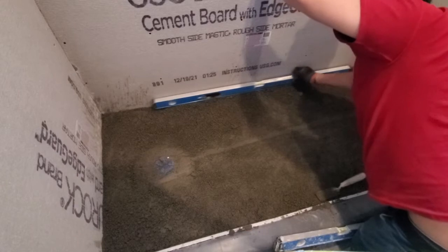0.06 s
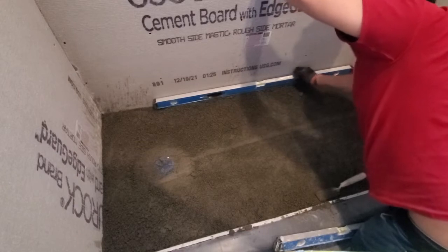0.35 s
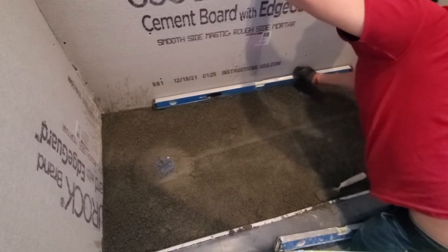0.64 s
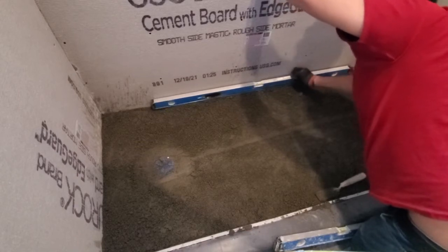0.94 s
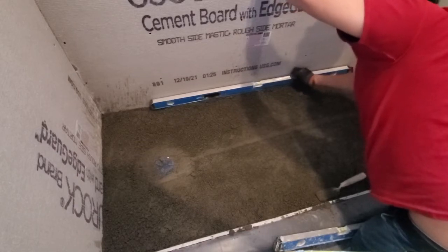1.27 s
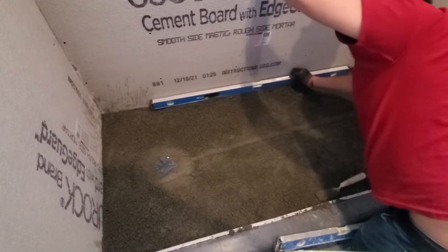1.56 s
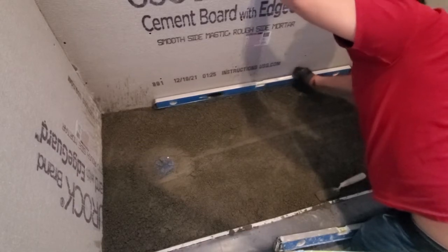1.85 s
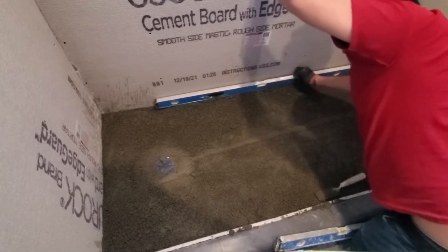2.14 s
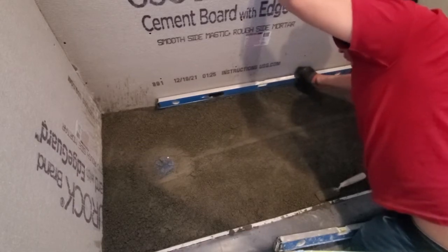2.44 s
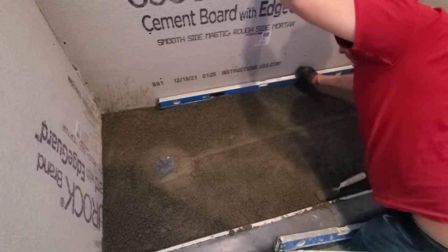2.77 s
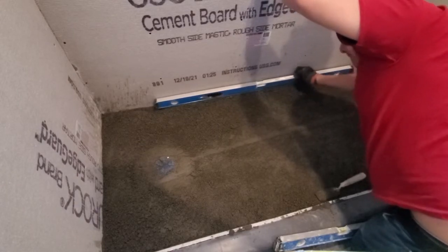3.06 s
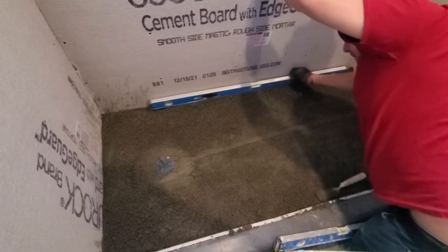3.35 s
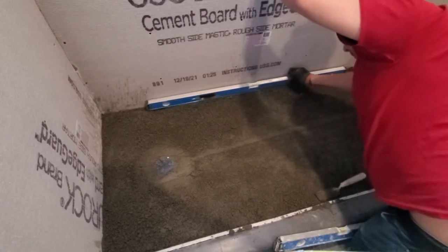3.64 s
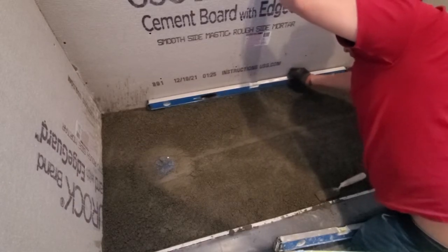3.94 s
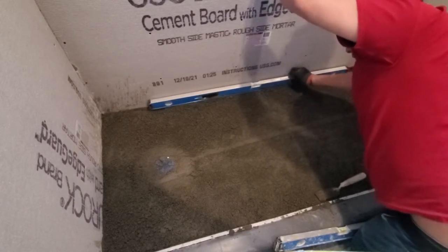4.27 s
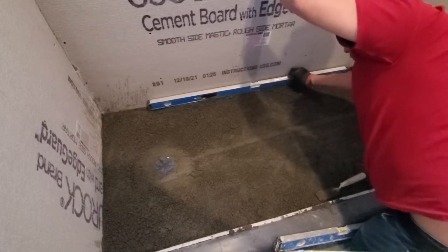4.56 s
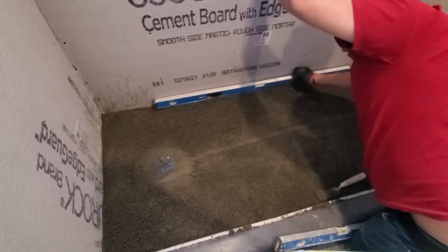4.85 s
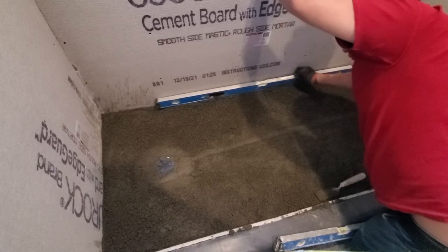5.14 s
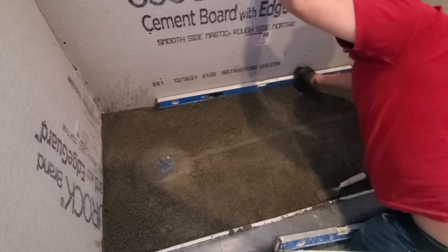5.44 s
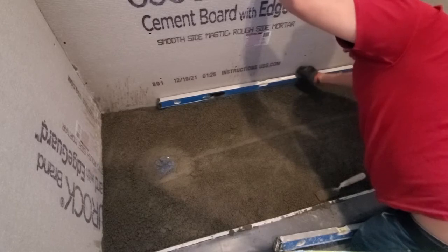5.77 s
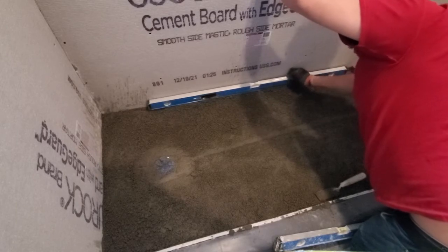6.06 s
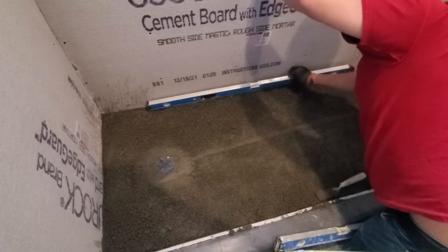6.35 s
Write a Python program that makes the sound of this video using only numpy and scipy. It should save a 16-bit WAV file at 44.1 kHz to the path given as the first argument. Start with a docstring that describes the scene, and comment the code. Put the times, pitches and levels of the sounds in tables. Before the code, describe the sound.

Fast, rhythmic, gritty scraping fills a small, hard-walled shower stall as a metal level is worked to and fro across a sandy mortar bed. Scattered knocks from the bar and soft thuds from the floor come through the strokes. After about six seconds the level lifts, is set down gently and skims twice more with a faint brushing hiss. The sound is close, with tight echoes.

```python
"""A long aluminium level is sawn to and fro over a damp sand-cement bed, three times a second.
Each stroke drags sand under its edge: coarse grit judders the bar, finer grit rasps, loose grains hiss.
The bar knocks on high spots; the floor thuds and rumbles under the shifting weight.
Near the end the level is lifted, set down and drawn twice lightly, with a faint brushing.
The board-lined shower stall adds short, dense echoes."""
import sys
import numpy as np
from scipy import signal
from scipy.fft import rfft, irfft, next_fast_len
from scipy.io import wavfile
from scipy.ndimage import uniform_filter1d

SR = 44100
rng = np.random.default_rng(int(sys.argv[2]) if len(sys.argv) > 2 else 0)


def put_to_file(sound):
    """Save the sound as 16-bit audio at rate SR, in the file named by the first command-line argument."""
    columns = np.atleast_2d(sound).T  # one column per channel
    safe = np.clip(columns, -1, 1)
    whole_steps = np.round(safe * 32767)
    wavfile.write(sys.argv[1], SR, whole_steps.astype(np.int16))


N = 286946
T = np.arange(N) / SR
PLACES = 6  # contact points along the edge
LIFT_S = 5.997  # the last push ends, the bar leaves the bed

# Broad spectra. Each row: frequency in Hz, relative density in dB.
ROOM_TONE_HZ_DB = [(20, -3), (70, -4), (150, -16), (400, -27), (2300, -30), (3200, -30), (4500, -26),
                   (5900, -15), (7500, -27), (9000, -23), (12000, -33.5), (15000, -47)]
RUMBLE_HZ_DB = [(15, -2), (35, -10), (55, -5), (68, 9), (85, 0.5), (110, 5.5), (145, 1.5), (220, -35),
                (600, -52)]
BRUSH_HZ_DB = [(200, -7), (2400, -1), (2900, 6), (4500, 0), (6200, -1), (7500, -8), (9500, 0), (12000, -5),
               (15500, -5)]
HOLLOW_BAR_HZ_DB = [(40, -5), (140, -8), (300, -12.5), (410, -16), (650, 0), (1150, -0.5), (1700, 0),
                    (2300, -6), (3100, 0), (3600, -18), (8000, -34)]
GRIND_HZ_DB = [(20, -10), (45, -19), (70, -3), (115, -2), (200, -5), (320, -8), (480, -8.5), (750, -5),
               (1100, -13.5), (2000, -21), (5000, -62.5)]
RASP_HZ_DB = [(200, -44.5), (600, -5), (1100, -5.5), (1750, 1.5), (2450, -1), (3100, 0.5), (3800, 0),
              (5000, -4), (5900, -7.5), (7000, -21), (10000, -40)]
HISS_HZ_DB = [(2000, -26), (5500, 3), (6500, -1.5), (7800, -4), (9600, 3), (11000, 0), (12600, 2.5),
              (15500, -0.5)]
KNOCK_HZ_DB = [(30, -47.5), (110, 2), (200, 4), (300, 0.5), (500, -10.5), (900, -9), (3000, -25),
               (9000, -64)]
# Microphone imbalance. Each row: frequency in Hz, right minus left in dB.
TILT_HZ_DB = [(60, 1.2), (250, 2.2), (600, 2.3), (1100, 0.89), (2200, 3.4), (4200, 1.7), (8000, 2.4),
              (12500, 4.1)]
# Floor modes. Each row: frequency in Hz, T60 in seconds, relative level in dB.
FLOOR_RING = [(51, 0.25, -11.5), (70.6, 0.15, 1.5), (108.4, 0.34, -15), (166.6, 0.17, -9.5)]
# Bar modes, bedded and skimming. Each row: frequency in Hz, width in Hz, strength in dB.
BEDDED_MODES = [(150.2, 8, 3.5), (182.6, 10, 0), (225, 9.5, -17), (290, 14, 11), (376, 20.6, 3.5),
                (430, 31, 0), (461, 48, 0.5), (525, 15, 2.5), (669, 8, -0.5), (754, 15, -12.5),
                (1312, 21, -4), (1434, 48, -10), (1643, 50, -6), (2205, 45, -22), (2808, 72, -0.5),
                (3453, 117, -2), (4380, 83, -5.5)]
SKIMMING_MODES = [(140, 16, 16.5), (283, 12, 22)]
# Weight shifts on the floor. Each row: start in seconds, relative level in dB.
THUDS_S_DB = [(0.185, -29.5), (0.476, -38), (0.766, -29.5), (1.072, -25), (1.100, -25.5), (1.420, -34),
              (1.489, -28.5), (1.750, -30), (4.440, -36), (5.114, -35)]
# The bar hits a high spot or is set down. Each row: start in seconds, relative level in dB.
KNOCKS_S_DB = [(0.571, -24), (1.505, -22), (1.832, -18), (2.093, -17.5), (2.552, -23), (2.559, -13),
               (2.842, -29), (3.560, -23), (4.199, -19.5), (4.265, -22.5), (5.258, -16), (5.280, -16),
               (5.500, -20.5), (5.523, -15.5), (6.329, -28), (6.356, -29)]
# Strokes after the lift. Each row: start in seconds, length in seconds, ring in dB, rasp in dB.
SKIMS = [(6.302, 0.13, -44, -45.5), (6.423, 0.105, -40.5, -50)]
# Heavy pushes, each lasting until the turn. Each row: start in seconds, relative level in dB.
PUSH_STROKES = [(-0.1, -28), (0.219, -34), (0.521, -33), (0.799, -32), (1.128, -30.5), (1.453, -30),
                (1.777, -28.5), (2.129, -29), (2.466, -29), (2.799, -28.5), (3.153, -28.5), (3.495, -29.5),
                (3.832, -30), (4.159, -31), (4.499, -28.5), (4.828, -31), (5.165, -29.5), (5.48, -33),
                (5.796, -32)]
# Light returns that bite into the ridge of sand left by the push.
# Each row: start in seconds, relative level in dB, bite in dB.
RETURN_STROKES = [(0.06, -34, 1), (0.362, -42, 2.5), (0.671, -38.5, 3.5), (0.978, -38, 4.5),
                  (1.309, -36, 2.5), (1.637, -35, 7.5), (1.982, -33, -2), (2.300, -32, -2.5),
                  (2.642, -33, -0.5), (2.989, -32.5, -0.5), (3.312, -32.5, 1), (3.673, -33, -1.5),
                  (4.007, -34.5, 0), (4.331, -36.5, 2.5), (4.668, -35, 0.5), (4.997, -36, 2),
                  (5.323, -37, 2), (5.627, -37, 0.5)]


def undb(db):
    """Decibels to gain."""
    return 10 ** (np.asarray(db) / 20)


def unit_rms(x):
    """Scale to rms 1."""
    return x / np.sqrt(np.mean(x ** 2))


def colour(x, spectrum_hz_db, modes=()):
    """Minimum-phase filter: a broad spectrum with narrow resonances on it."""
    size = next_fast_len(N + SR // 2)
    hz = np.maximum(np.fft.rfftfreq(size, 1 / SR), 1)
    point_hz, point_db = np.transpose(spectrum_hz_db)
    broad = undb(np.interp(np.log(hz), np.log(point_hz), point_db))
    power = np.ones(len(hz))
    for centre_hz, width_hz, strength_db in modes:
        power += undb(strength_db) ** 2 * np.pi / (1 + (2 * (hz - centre_hz) / width_hz) ** 2)
    cepstrum = irfft(np.log(broad * np.sqrt(power)), size)
    cepstrum[1:size // 2] *= 2
    cepstrum[size // 2 + 1:] = 0
    return irfft(rfft(x, size) * np.exp(rfft(cepstrum)), size)[..., :N]


def wander(rate_hz):
    """Smooth random drift, rms 1."""
    hold = max(int(SR / rate_hz), 1)
    steps = np.repeat(rng.standard_normal(N // hold + 1), hold)
    return unit_rms(uniform_filter1d(steps, hold)[:N])


def grains(rate_per_s, spread_db):
    """Unequal grains catch at random, one row per place; steady mean power."""
    chance = np.clip(rate_per_s / PLACES / SR, 1e-4, 1)
    caught = rng.random((PLACES, N)) < chance
    size = np.clip(rng.standard_normal((PLACES, N))[caught], -2, 2)
    sign = rng.choice([-1, 1], (PLACES, N))[caught]
    impulses = np.zeros((PLACES, N))
    impulses[caught] = sign * undb(spread_db * size)
    return impulses / np.sqrt(chance)


def blows(rows):
    """One impulse per row."""
    force = np.zeros(N)
    for start_s, level_db in rows:
        force[int(start_s * SR)] += undb(level_db)
    return force


def contact(release_s):
    """1 until the bar is lifted, then decaying."""
    return np.exp(-np.maximum(T - LIFT_S, 0) / release_s)


def room_tone(level_db):
    """Steady noise, independent in each channel."""
    return undb(level_db) * unit_rms(colour(rng.standard_normal((2, N)), ROOM_TONE_HZ_DB))


def stall(places, t60_s, treble_t60_s, wet_db, diffuse_hz):
    """Close hard walls: each place echoes differently to each microphone; long waves reach both alike."""
    t = T[:SR // 3]
    size = next_fast_len(N + len(t))
    hz = np.fft.rfftfreq(size, 1 / SR)
    wet_share = hz ** 2 / (hz ** 2 + diffuse_hz ** 2) / (1 + undb(-wet_db) ** 2)
    lags_s = 0.00025 * np.linspace(-1, 1, len(places))  # the nearer microphone hears it first
    spectrum = 0
    for place, lag_s in zip(places, lags_s):
        noise = rng.standard_normal((2, len(t)))
        dull = signal.sosfilt(signal.butter(1, 5000, fs=SR, output="sos"), noise)
        tail = dull * undb(-60 * t / t60_s) + (noise - dull) * undb(-60 * t / treble_t60_s)
        tail *= t > 0.002
        tail /= np.sqrt(np.sum(tail ** 2, axis=1, keepdims=True))
        advance = np.exp(1j * np.pi * hz * lag_s)
        direct = np.array([advance, advance.conj()])
        response = np.sqrt(1 - wet_share) * direct + np.sqrt(wet_share) * rfft(tail, size)
        spectrum += rfft(place, size) * response
    return irfft(spectrum, size)[:, :N]


def floor_rumble(speed, level_db, sway, resting_db):
    """Moving weight shakes the floor, most in mid-stroke; it settles after the lift."""
    effort = (1 + sway * speed) * contact(release_s=0.032) + undb(resting_db)
    return undb(level_db) * effort * unit_rms(colour(rng.standard_normal(N), RUMBLE_HZ_DB))


def floor_thuds(rise_s, gain_db):
    """The floor gives as weight shifts; the slow push wakes only its lowest modes."""
    t = T[:SR // 2]
    ring = sum(undb(db - 60 * t / t60_s) * np.sin(2 * np.pi * hz * t) for hz, t60_s, db in FLOOR_RING)
    ring *= 1 - np.exp(-(t / rise_s) ** 2)
    ring /= np.abs(ring).max()
    return undb(gain_db) * signal.fftconvolve(blows(THUDS_S_DB), ring)[:N]


def brush(start_s, attack_s, fade_db_per_s, level_db):
    """Very fine contacts make a faint hiss that swells and fades."""
    t = np.maximum(T - start_s, 0)
    envelope = np.minimum(t / attack_s, 1) * undb(level_db - fade_db_per_s * t)
    hiss = unit_rms(colour(grains(20000, spread_db=7), BRUSH_HZ_DB))
    return hiss * envelope / np.sqrt(PLACES)


def light_drag():
    """Barely damped by the sand, the skimming bar rings hollow, swelling with speed."""
    grit = grains(4000, spread_db=3.5)
    ring = unit_rms(colour(grit, HOLLOW_BAR_HZ_DB, SKIMMING_MODES))
    rasp = unit_rms(colour(grit, RASP_HZ_DB))
    drag = 0
    for start_s, length_s, ring_db, rasp_db in SKIMS:
        speed = np.sin(np.pi * np.clip((T - start_s) / length_s, 0, 1))
        drag += np.abs(speed) ** 0.91 * (undb(ring_db) * ring + undb(rasp_db) * rasp)
    return drag / np.sqrt(PLACES)


def bar_knocks(body_db, crunch_db, crunch_s):
    """Sand-cushioned blows ring the bar's low modes and crush a few grains."""
    force = blows(KNOCKS_S_DB)
    body = colour(force, KNOCK_HZ_DB, BEDDED_MODES)
    crush = signal.lfilter([1], [1, -np.exp(-1 / (crunch_s * SR))], force)
    crunch = crush * unit_rms(colour(rng.standard_normal(N), RASP_HZ_DB, BEDDED_MODES))
    return undb(body_db) * body + undb(crunch_db) * crunch


def arm_strokes(push_lean_db, return_lean_db, bite_at_share, bite_width_share):
    """Each stroke is a half sine of speed; hand pressure ramps across it, with a bite on returns."""
    pushes = [(start_s, db, 0, True) for start_s, db in PUSH_STROKES]
    returns = [(start_s, db, bite_db, False) for start_s, db, bite_db in RETURN_STROKES]
    starts_s, stroke_db, bite_db, is_push = np.transpose(sorted(pushes + returns))
    count = np.interp(T, np.append(starts_s, LIFT_S), np.arange(len(starts_s) + 1))
    stroke = np.minimum(count.astype(int), len(starts_s) - 1)
    progress = count - stroke
    pushing = is_push[stroke] > 0
    speed = np.abs(np.sin(np.pi * progress))
    lean_db = np.where(pushing, push_lean_db, return_lean_db) * (progress - 0.5)
    ridge = np.exp(-((progress - bite_at_share) / bite_width_share) ** 2)
    return speed, stroke_db[stroke], lean_db + bite_db[stroke] * ridge, pushing


def scraping(speed, stroke_db, pressure_db, pushing, gain_db):
    """Sand grinds, rasps and hisses under the edge; speed sets how many grains strike and how hard."""
    grind_db = np.where(pushing, -3.5, -8)
    hiss_db = np.where(pushing, -8.5, -6.5)
    judder_db = 1.13 * wander(130) + 0.65 * wander(26)  # the edge rides unevenly
    creep, rocking = 0.065, 0.072  # fine and coarse grains still shift at the turn
    flow = speed + creep
    grit = grains(2600 * flow, spread_db=3)
    # Pressed into the sand on a push, the bar's modes widen and weaken.
    pressed_modes = np.array(BEDDED_MODES) * [1, 1.27, 1] - [0, 0, 2.5]
    push_grind = colour(grit * pushing, GRIND_HZ_DB, pressed_modes)
    return_grind = colour(grit * ~pushing, GRIND_HZ_DB, BEDDED_MODES)
    grind = unit_rms(push_grind + return_grind)
    rasp = unit_rms(colour(grains(9000 * flow, spread_db=4.5), RASP_HZ_DB, BEDDED_MODES))
    hiss = unit_rms(colour(grains(14000 * flow, spread_db=4.5), HISS_HZ_DB))
    # Coarse grit rolls once the bar is under way, then levels off.
    grind *= (np.tanh(1.83 * speed ** 1.6) + rocking) * undb(grind_db + pressure_db)
    rasp *= (np.tanh(1.145 * speed ** 1.33) + creep) * undb(pressure_db)
    hiss *= (speed ** 1.06 + creep) * undb(hiss_db)
    envelope = undb(gain_db + stroke_db + judder_db) * contact(release_s=0.006)
    return (grind + rasp + hiss) * envelope / np.sqrt(PLACES)


def scene():
    """The bar in the stall, knocking near its middle, over floor noise and room tone."""
    speed, stroke_db, pressure_db, pushing = arm_strokes(
        push_lean_db=-0.5, return_lean_db=8.5, bite_at_share=0.64, bite_width_share=0.079)
    bar = scraping(speed, stroke_db, pressure_db, pushing, gain_db=1.5)
    bar += light_drag()
    bar += brush(start_s=6.235, attack_s=0.08, fade_db_per_s=28, level_db=-51)
    bar[PLACES // 2] += bar_knocks(body_db=26.5, crunch_db=-11.5, crunch_s=0.0057)
    floor = floor_thuds(rise_s=0.016, gain_db=2)
    floor += floor_rumble(speed, level_db=-50.5, sway=0.57, resting_db=-25.5)
    tone = room_tone(level_db=-64)
    return stall(bar, t60_s=0.26, treble_t60_s=0.17, wet_db=4.5, diffuse_hz=483) + floor + tone


def record(dry):
    """Right microphone slightly louder and brighter; low-pass at 15750 Hz."""
    left = colour(dry[0], np.array(TILT_HZ_DB) * [1, -0.5])
    right = colour(dry[1], np.array(TILT_HZ_DB) * [1, 0.5])
    lowpass = signal.ellip(10, 0.2, 80, 15750, fs=SR, output="sos")
    return signal.sosfilt(lowpass, np.array([left, right]))


dry = scene()
out = record(dry)
put_to_file(out)
```